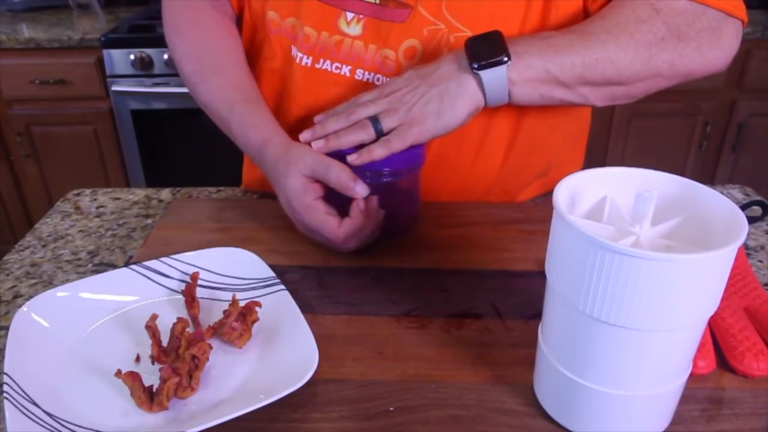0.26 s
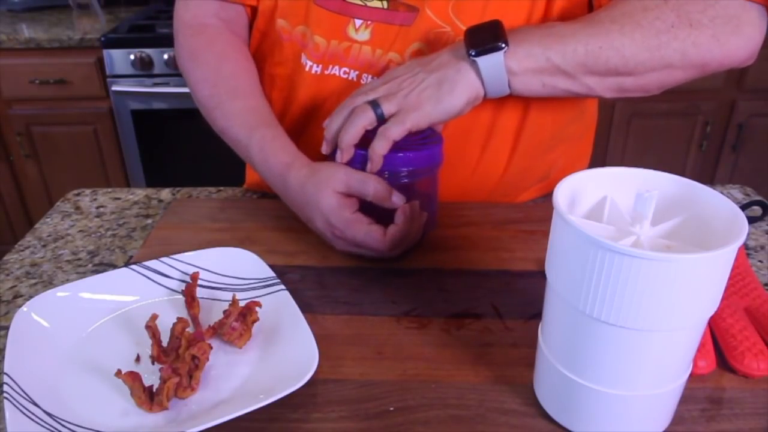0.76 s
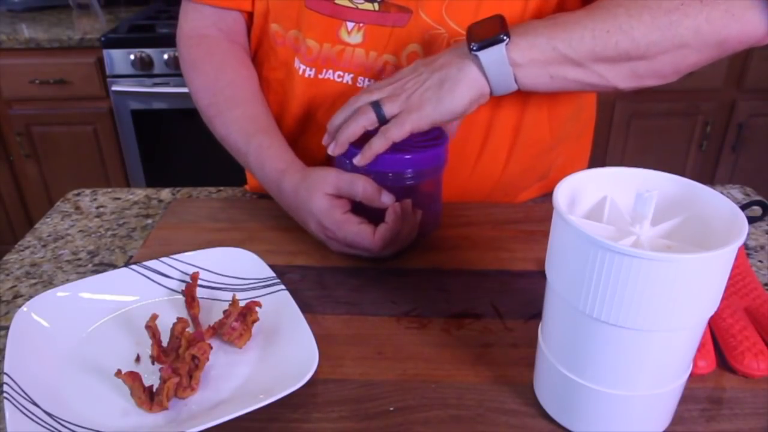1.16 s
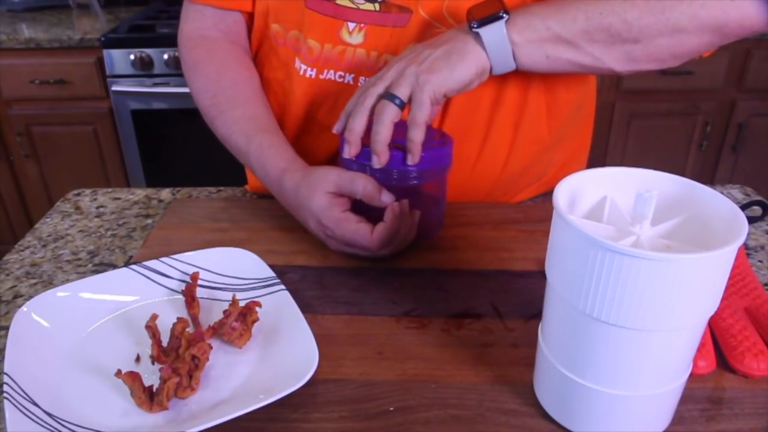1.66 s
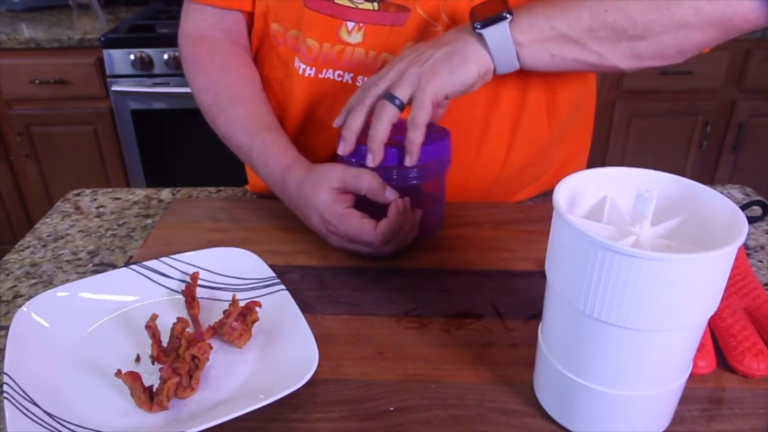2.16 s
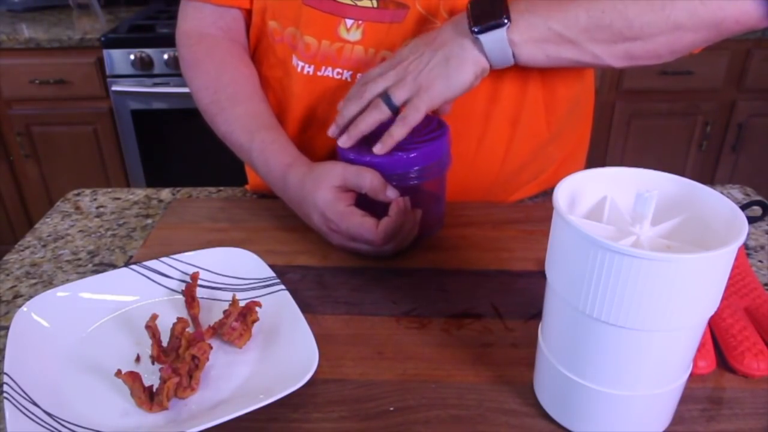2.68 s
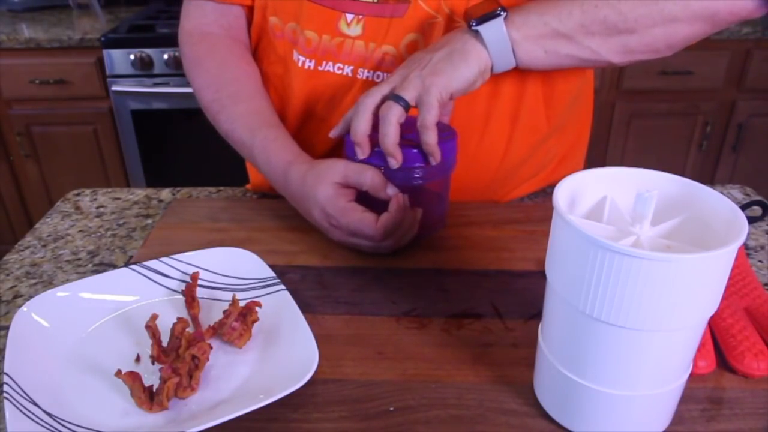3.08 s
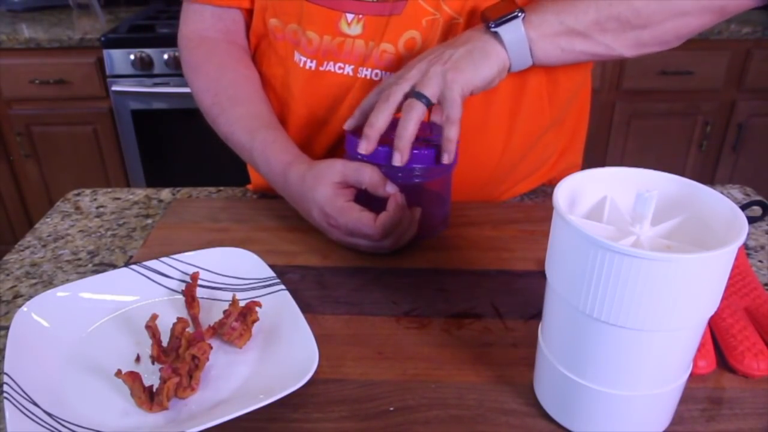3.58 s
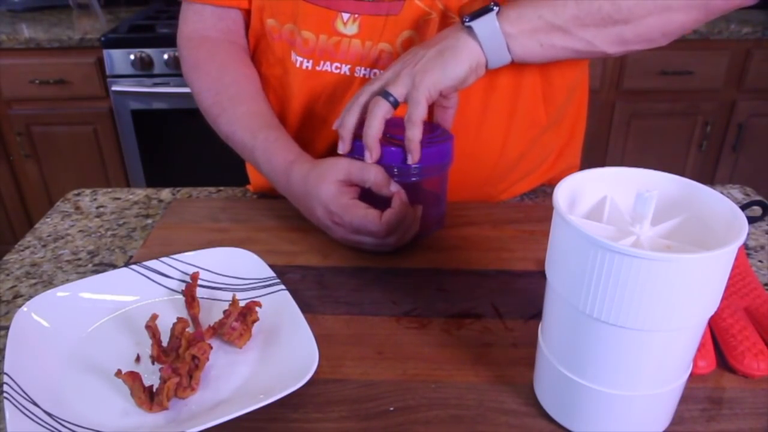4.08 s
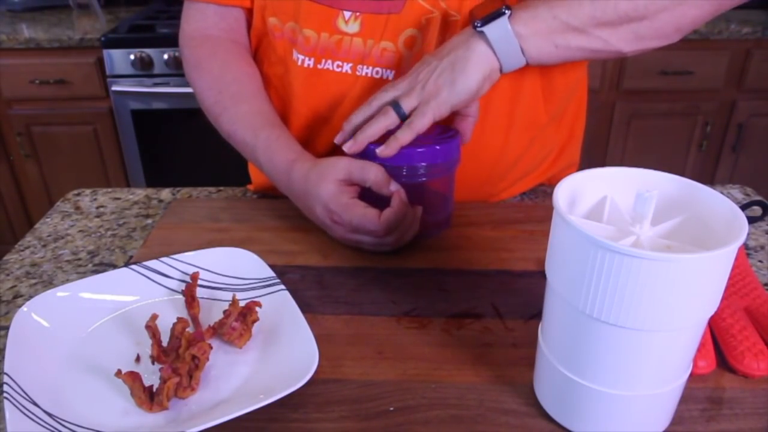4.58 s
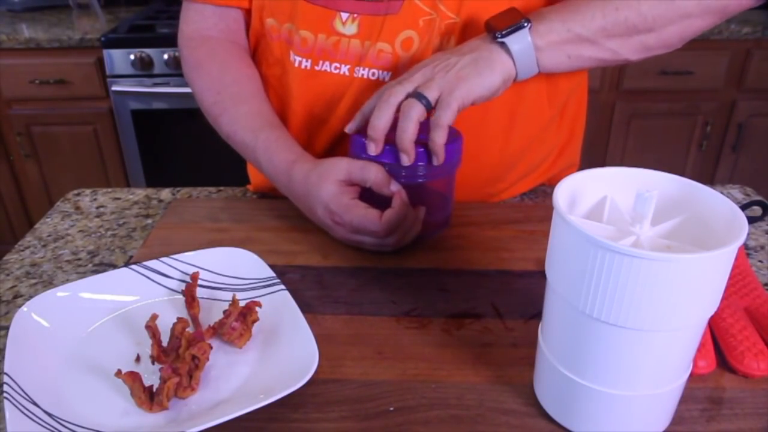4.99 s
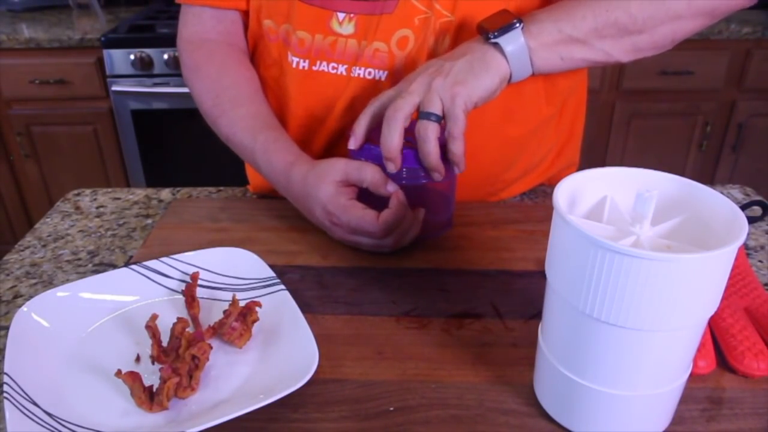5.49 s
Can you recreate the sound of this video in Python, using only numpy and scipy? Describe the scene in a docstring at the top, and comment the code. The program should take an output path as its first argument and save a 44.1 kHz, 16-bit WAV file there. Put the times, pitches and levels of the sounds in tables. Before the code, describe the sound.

Small hollow plastic taps, sharp snaps and quiet grainy scraping as a tub lid is turned by hand in a hard-walled room.

```python
"""A knock and a scrape at once: fingertips turn a plastic screw lid on a small tub on a wooden kitchen board.
Each contact of lid, rim and fingers rings the tub's modes and adds a short bright snap.
Between them the threads scrape: grainy noise drags in the body, rasps on the lid and hisses; skin rubs once.
The hard-walled room answers, and one microphone some way off hears it all over a faint room hush."""
import sys
import numpy as np
from scipy import signal
from scipy.fft import rfft, irfft, next_fast_len
from scipy.io import wavfile

SR = 44100
rng = np.random.default_rng(int(sys.argv[2]) if len(sys.argv) > 2 else 0)


def materialize(psi):
    """Save the field psi as 16-bit PCM at rate SR to the path in sys.argv[1].

    A 1-D psi becomes a single channel; in a 2-D psi each row is a channel.
    """
    bounded = np.clip(np.atleast_2d(psi).T, -1, 1)
    quanta = np.round(bounded * 32767).astype(np.int16)
    wavfile.write(sys.argv[1], SR, quanta)


def makeup_ratio(level_db):
    """Linear amplitude ratio for a level in decibels (20 dB per factor of ten)."""
    decades = np.asarray(level_db, float) / 20
    return 10 ** decades


N = 253134

# Modes of tub and lid. Each row: frequency in Hz, relative level in dB.
TUB_MODES = [(120, -38), (150, -5.5), (195, 2.5), (235, 2), (303, 7), (330, 0), (435, -3.5), (525, 6),
             (690, 0.5), (800, -0.5), (925, -3), (1035, -2), (1200, -3.5), (1290, -15.5), (1555, -7),
             (1900, -8), (2320, -14), (2680, -4.5), (3110, -12.5), (3680, -28), (4250, -10.5), (5800, -9)]
# Colour of the snaps and of the thread hiss. Each row: frequency in Hz, relative density in dB per Hz.
SNAP_COLOUR = [(100, 11), (1000, 7.5), (4000, 1.5), (5000, -3), (6500, -2.5), (10000, -8), (12500, -13),
               (16000, -23)]


def contacts():
    """Every contact rings the modes by its hardness and adds a short snap."""
    # Contacts of lid, rim and fingers. Each row: time in seconds, relative thump into the tub in dB,
    # relative knock of the lid in dB, centre of the knock in Hz, relative snap of the thread in dB.
    touches = [(0.0, -25.5, -32.5, 652, -45.5), (0.322, -53, -53, 1800, -62),
               (0.447, -44.5, -46.5, 750, -66), (0.545, -33, -42, 648, -70), (0.721, -41.5, -57, 790, -58),
               (0.892, -43.5, -58, 2000, -58), (0.916, -28.5, -41, 1980, -39.5),
               (0.934, -33, -36.5, 1040, -38), (0.936, -63, -41, 4200, -60), (1.035, -63, -40.5, 595, -54),
               (1.057, -56, -48, 1100, -45), (1.07, -27.5, -39.5, 915, -37), (1.075, -56, -40, 2280, -59),
               (1.103, -51, -46, 2370, -44), (1.117, -30, -46, 2360, -46), (1.15, -51, -49, 1600, -43),
               (1.155, -24, -35.5, 1390, -40.5), (1.189, -38, -48, 1555, -64), (1.215, -43, -58, 600, -63),
               (1.249, -42.5, -44, 910, -43.5), (1.587, -37.5, -62, 1290, -64),
               (1.611, -40, -46.5, 1040, -57), (1.647, -39, -30.5, 574, -53),
               (1.713, -27, -37.5, 1250, -44.5), (1.717, -29.5, -44, 1290, -40.5),
               (1.962, -32, -41, 740, -49), (1.984, -36, -50.5, 1200, -57),
               (1.998, -39.5, -52.5, 4250, -65), (2.122, -80, -55, 7040, -58),
               (2.179, -31.5, -58, 900, -63), (2.202, -35, -52, 760, -69), (2.28, -42, -37, 1030, -45),
               (2.298, -30.5, -36.5, 605, -42.5), (2.505, -35, -53, 1410, -60),
               (2.552, -64, -47.5, 940, -62), (2.597, -37, -49, 705, -59), (2.673, -50, -39, 1280, -65),
               (2.682, -23, -33, 1820, -27.5), (2.824, -37.5, -56, 1540, -57), (2.912, -44, -57, 4250, -70),
               (2.981, -40, -50.5, 700, -52), (2.994, -38, -45, 925, -56), (3.04, -37.5, -40.5, 850, -43.5),
               (3.143, -33, -38.5, 890, -42.5), (3.212, -26.5, -32, 748, -60),
               (3.287, -22.5, -35.5, 900, -38.5), (3.608, -40, -49.5, 635, -51),
               (3.663, -42.5, -49, 730, -58), (3.714, -32.5, -39, 720, -38.5), (3.787, -31, -41, 661, -48),
               (3.925, -60, -57, 8200, -75), (4.054, -43.5, -50.5, 813, -58),
               (4.165, -36.5, -53, 1390, -53), (4.18, -37.5, -42.5, 1160, -48),
               (4.236, -33.5, -52, 730, -49.5), (4.409, -43, -56, 800, -71), (4.449, -30, -41, 790, -44),
               (4.453, -32.5, -31.5, 1030, -28), (4.458, -23, -29.5, 1230, -26),
               (4.772, -19.5, -34.5, 1005, -39), (4.952, -33, -45.5, 700, -54),
               (4.969, -29.5, -39, 935, -45), (4.993, -34.5, -37, 1200, -39.5),
               (5.004, -48, -44, 1730, -46), (5.142, -41, -52.5, 557, -74), (5.416, -46, -67, 490, -79),
               (5.563, -37.5, -47, 717, -47.5), (5.58, -33, -52, 660, -70), (5.67, -75, -51.5, 5940, -78),
               (5.714, -43, -46, 577, -72), (5.728, -40, -48.5, 694, -53)]
    delay = 0.0018  # short delay in s of every contact's sound
    out = np.zeros(N + SR)
    t = np.arange(SR // 8) / SR
    mode_hz, mode_db = np.transpose(TUB_MODES)[:, :, None]
    for start, *touch in touches:
        # each contact rings at slightly different, randomly drawn pitches
        hz = mode_hz * rng.normal(1, 0.012, mode_hz.shape)
        uneven_db = rng.normal(0, 1.77, hz.shape)
        size = makeup_ratio(blow(hz, *touch) + 2.5 + mode_db + uneven_db)
        rise = 1 - np.exp(-t * hz / 0.5)  # each mode builds over part of its cycle
        decay = makeup_ratio(-60 * t / ring_time(hz))
        ring = np.sum(size * rise * decay * np.sin(2 * np.pi * hz * t), axis=0)
        crack = snap(lambda f: along(SNAP_COLOUR, f) + blow(f, *touch) + 26, t, lead=0.001, length=0.012)
        sound = echoed(crack - ring, wet_db=-3, gap=0.006)
        out[round((start + delay) * SR):][:len(sound)] += sound
    # a small tub radiates no deep bass
    return filtered(out[:N], lambda f: (1j * f / (1j * f + 130)) ** 3)


def blow(f, thump_db, knock_db, knock_hz, snap_db):
    """Spectrum in dB of one contact: a soft thump, a knock around its centre and a bright snap."""
    thump_hz, thump_fall_db = 264.8, 27  # a fingertip is soft: its push loses this much an octave above
    knock_fall_db = 4.5  # loss one octave off the centre, growing with the square
    favour_db, favour_octaves = 7, 0.08  # modes right at the centre of the knock ring out more
    snap_hz, snap_fall_db = 7000, 8  # the snap loses this much an octave below

    def octaves_above(hz):
        return np.log2((f + 1) / hz)

    off = octaves_above(knock_hz) ** 2
    thump = thump_db - thump_fall_db * np.maximum(octaves_above(thump_hz), 0)
    knock = knock_db - knock_fall_db * off + favour_db * np.exp(-off / favour_octaves ** 2)
    bright = snap_db + snap_fall_db * np.minimum(octaves_above(snap_hz), 0)
    return 10 * np.log10(sum(makeup_ratio(part) ** 2 for part in (thump, knock, bright)))


def ring_time(hz):
    """Seconds that gripped plastic takes to fall 60 dB: short, and shorter for higher modes."""
    return 0.042 * (300 / hz) ** 0.45


def snap(colour, t, lead, length):
    """A crack keeps the scattered phases of a short noise burst; its spectrum follows the colour in dB."""
    burst = rfft((t > lead) * makeup_ratio(-60 * (t - lead) / length) * rng.standard_normal(len(t)))
    size = makeup_ratio(colour(np.fft.rfftfreq(len(t), 1 / SR)))
    crack = irfft(burst / np.abs(burst) * size, len(t))
    return crack * np.clip(t / lead, 0, 1) ** 2 * makeup_ratio(-60 * t / 0.42)


def slide():
    """Slips in the threads shake the body, rasp the lid and hiss; the room blurs them."""
    hiss_db, steady_db = -8.5, -81  # hiss against the scrape; a faint steady hiss under the scraping
    scrape = twist(column=3)
    drag = twist(column=2) * unit(filtered(grit(60, 3), body(140, 480, damping=0.8)))
    rasp = scrape * unit(filtered(grit(350, 2.2), body(480, 2100, damping=0.7)))
    fine = filtered(grit(500, 3.2), lambda f: makeup_ratio(along(SNAP_COLOUR, f)) * f ** 2 / (f ** 2 + 2500 ** 2))
    hiss = (makeup_ratio(hiss_db) * scrape + makeup_ratio(steady_db)) * unit(fine)
    dry_slide = drag + rasp + hiss + rub()
    out = np.zeros(N + 2 * SR)
    step = SR // 3  # each third of a second gets its own answer of the room
    for start in range(0, N, step):
        sound = echoed(dry_slide[start:start + step], wet_db=0.5, gap=0.00067)
        out[start:][:len(sound)] += sound
    return out[:N]


def twist(column):
    """Gain of one column of the twists: it sets in, holds and dies away."""
    # Twists of the lid. Each row: start in seconds, length in seconds,
    # drag through the body in dB and scrape on the lid in dB, both ahead of the room's answer.
    turns = [(0.0, 0.23, -61.5, -60.5), (0.32, 0.36, -66, -63.5), (0.869, 0.2, -57.5, -62.5),
             (1.062, 0.1, -58, -55), (1.3, 0.057, -59, -72), (1.613, 0.13, -63, -68),
             (1.834, 0.16, -57.5, -66.5), (2.282, 0.025, -46, -54), (2.51, 0.35, -62.5, -63.5),
             (2.99, 0.25, -54.5, -62.5), (3.297, 0.078, -61.5, -62.5), (3.654, 0.17, -49.5, -61.5),
             (4.101, 0.18, -61, -70.5), (4.39, 0.29, -62.5, -62), (4.792, 0.31, -62, -66.5),
             (5.084, 0.2, -65.5, -70), (5.536, 0.26, -71, -70)]
    grip_db_per_s, let_go_db_per_s = 198, 162  # how fast a twist sets in and dies away
    t = np.arange(N) / SR
    gain = 0
    for row in turns:
        start, length = row[:2]
        early = np.maximum(start - t, 0)
        late = np.maximum(t - start - length, 0)
        gain = gain + makeup_ratio(row[column] - grip_db_per_s * early - let_go_db_per_s * late)
    return gain


def grit(rate, spread_db):
    """Random small slips (rate per second) of uneven size over a bed of fine friction noise."""
    struck = rng.random(N) < rate / SR
    size = makeup_ratio(spread_db * rng.exponential(size=N))
    slips = struck * size * rng.standard_normal(N)
    return unit(slips) + 1.02 * rng.standard_normal(N)


def rub():
    """Skin drags on smooth plastic and sings in a few narrow bands."""
    # Level points of one finger rub. Each row: time in seconds, level in dB ahead of the room's answer.
    rub_level = [(3.51, -80), (3.54, -67), (3.6, -63), (3.66, -58), (3.71, -57), (3.75, -75)]
    # Bands that sing. Each row: frequency in Hz, width in Hz, relative level in dB.
    squeak = [(1280, 130, 0), (3250, 300, -14), (4800, 250, -20)]
    s, db = np.transpose(rub_level)
    gain = makeup_ratio(np.interp(np.arange(N) / SR, s, db, left=-120, right=-120))
    return gain * unit(filtered(grit(600, 1.5), resonances(squeak)))


def body(lo_hz, hi_hz, damping):
    """The tub's modes between two frequencies; damping scales the width that their ring time gives."""
    modes = []
    for centre, db in TUB_MODES:
        if lo_hz < centre < hi_hz:
            width = damping * np.log(1000) / np.pi / ring_time(centre)
            modes.append((centre, width, db))
    return resonances(modes)


def resonances(modes):
    """Causal response of (Hz, width Hz, dB) modes, with signs that alternate."""
    def response(f):
        total = 0
        for k, (centre, width, db) in enumerate(modes):
            pole = 1j * f * width / (centre * centre - f * f + 1j * f * width)
            total = total + (-1) ** k * makeup_ratio(db) * pole
        return total
    return response


def echoed(x, wet_db, gap):
    """x with a fresh answer of the room: noise in which each frequency dies at its own speed."""
    # Answer of the kitchen. Each row: frequency in Hz, time to fall 60 dB in seconds, relative level in dB.
    kitchen = [(106, 0.69, -15.5), (278, 0.22, 3), (740, 0.4, -2.5), (1950, 0.4, 3.5), (4640, 0.33, 3.5),
               (11900, 0.29, 1.5)]
    band_hz, t60, answer_db = np.transpose(kitchen)
    hz, t, z = signal.stft(rng.standard_normal(SR * 3 // 5), SR, nperseg=256)
    fall_time = along(list(zip(band_hz, t60)), hz)[:, None]
    tail = signal.istft(z * makeup_ratio(-60 * t / fall_time), SR, nperseg=256)[1]
    tail = tail * (1 - np.exp(-np.arange(len(tail)) / SR / gap))  # the first walls take a moment
    tail = tail / np.linalg.norm(tail)
    tail = filtered(tail, lambda f: makeup_ratio(wet_db + along(list(zip(band_hz, answer_db)), f)))
    wet = signal.fftconvolve(x, tail)
    return wet + np.pad(x, (0, len(wet) - len(x)))


def room_hush():
    """The faint hush of the room: steady coloured noise, alike in both channels."""
    # Colour of the hush. Each row: frequency in Hz, relative density in dB per Hz.
    colour = [(15, -17), (25, -2.5), (384, -4.5), (451, -18.5), (607, -7), (677, -13), (988, -12),
              (1560, -16.5), (1890, -22.5), (9840, -23.5), (16000, -29)]
    return steady_noise(colour, db=-62.5)


def hiss_apart():
    """Very faint steady noise that enters the two channels with opposite signs."""
    # Colour of this hiss. Each row: frequency in Hz, relative density in dB per Hz.
    colour = [(25, 4), (300, -4.5), (3000, -8), (9000, -11), (12500, -6), (15800, 5.5)]
    return steady_noise(colour, db=-77.0)


def steady_noise(spectrum, db):
    """Steady noise of a given colour and rms level."""
    return makeup_ratio(db) * unit(filtered(rng.standard_normal(N), lambda f: makeup_ratio(along(spectrum, f))))


def unit(x):
    """x at rms 1."""
    return x / np.sqrt(np.mean(x ** 2) + 1e-20)


def along(points, hz):
    """(Hz, value) points read on a log frequency axis."""
    f, v = np.transpose(points)
    return np.interp(np.log(hz + 1), np.log(f + 1), v)


def filtered(x, response):
    """x with its spectrum multiplied by a response of frequency in Hz."""
    m = next_fast_len(len(x) + 4096)
    return irfft(rfft(x, m) * response(np.fft.rfftfreq(m, 1 / SR)), m)[:len(x)]


def scene():
    """One microphone feeds both channels, which differ only by a very faint hiss."""
    mid = contacts() + slide() + room_hush()
    side = hiss_apart()
    return np.array([mid + side, mid - side])


def band_limit(x):
    """A steep low-pass at the top of the band."""
    return signal.sosfilt(signal.butter(12, 16490, fs=SR, output="sos"), x)


def record(dry):
    """Each channel is cut off steeply at the top of the treble."""
    top_hz = 15850
    mix = np.array([filtered(channel, lambda f: f < top_hz) for channel in dry])
    return band_limit(mix)


dry = scene()
out = record(dry)
materialize(out)
```